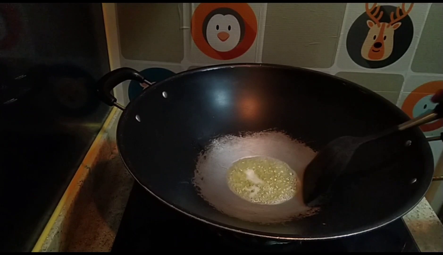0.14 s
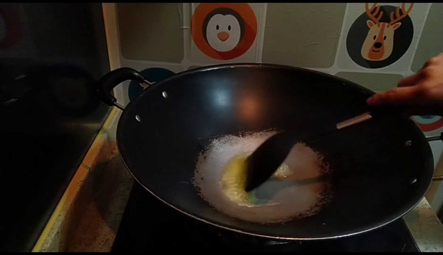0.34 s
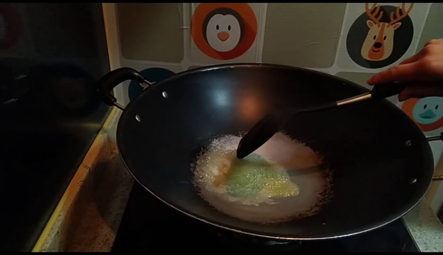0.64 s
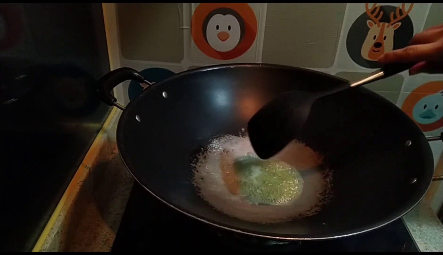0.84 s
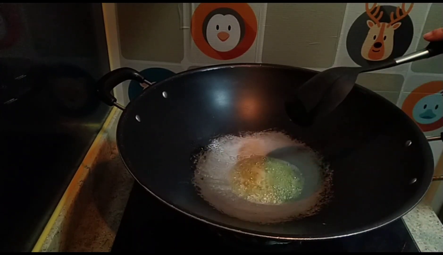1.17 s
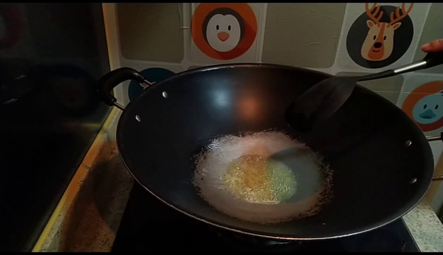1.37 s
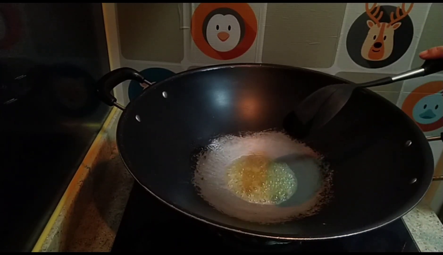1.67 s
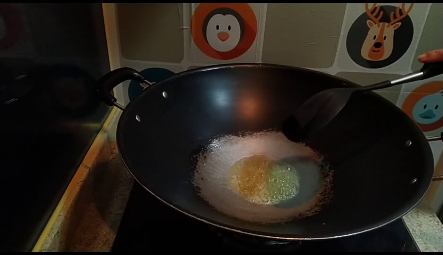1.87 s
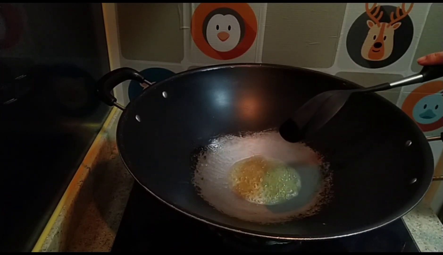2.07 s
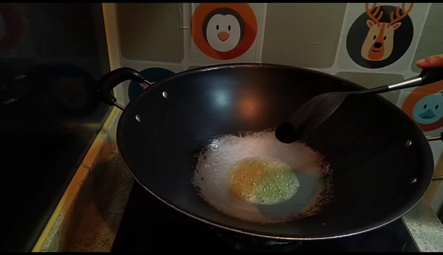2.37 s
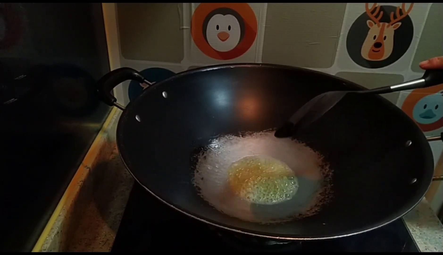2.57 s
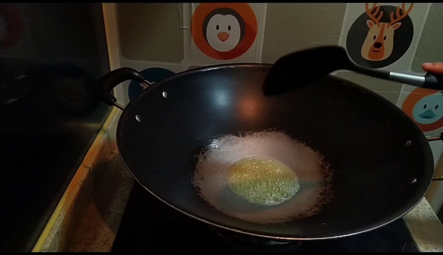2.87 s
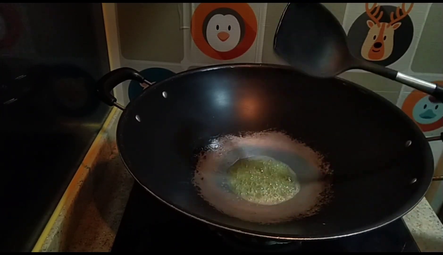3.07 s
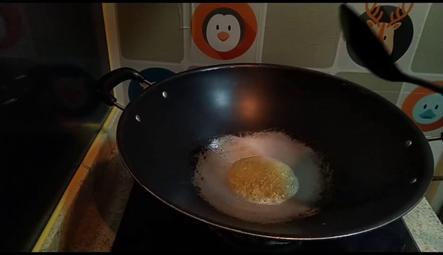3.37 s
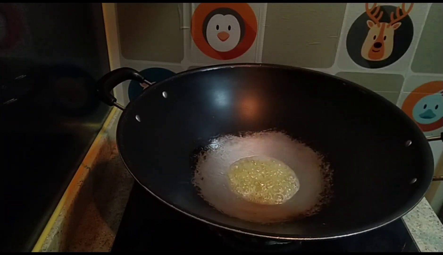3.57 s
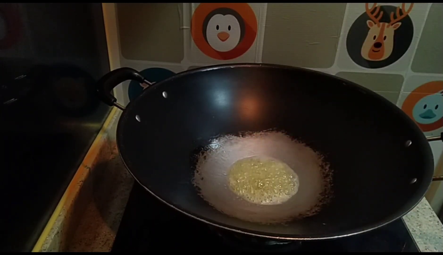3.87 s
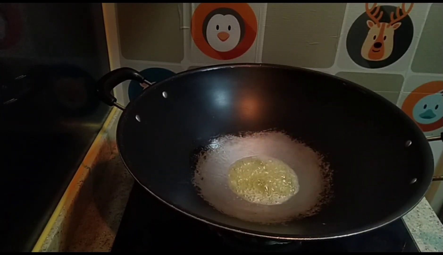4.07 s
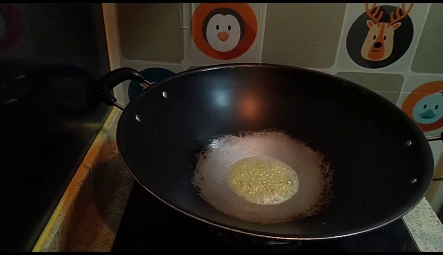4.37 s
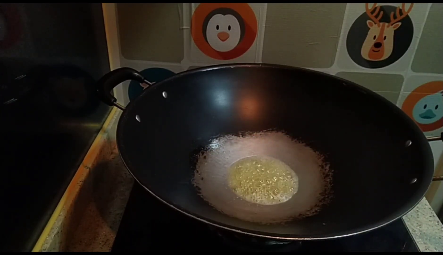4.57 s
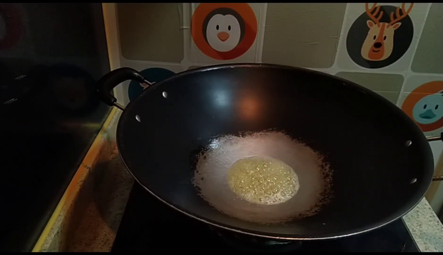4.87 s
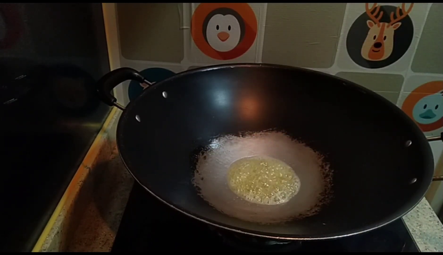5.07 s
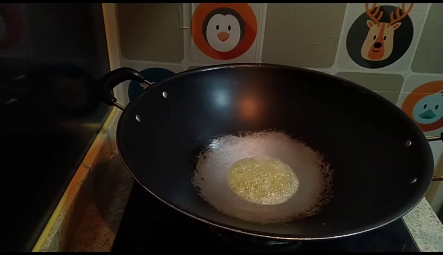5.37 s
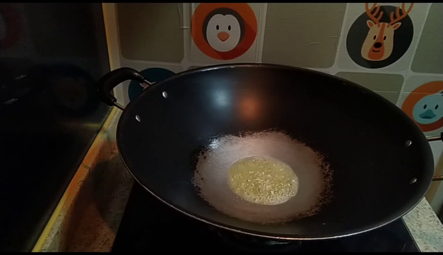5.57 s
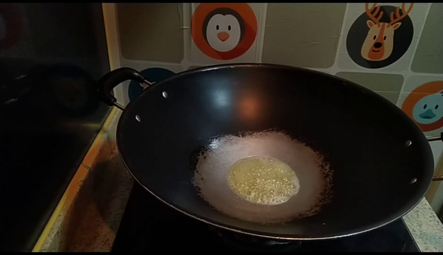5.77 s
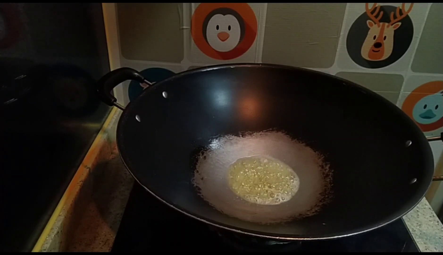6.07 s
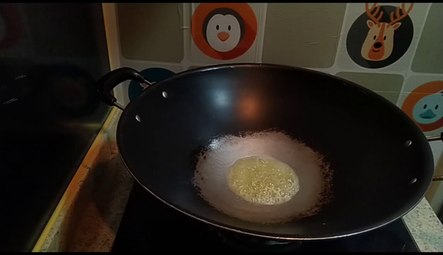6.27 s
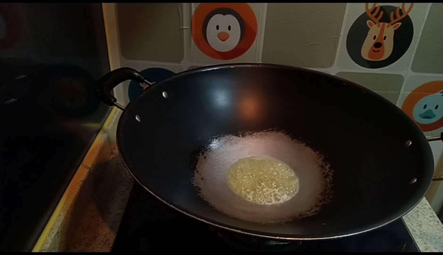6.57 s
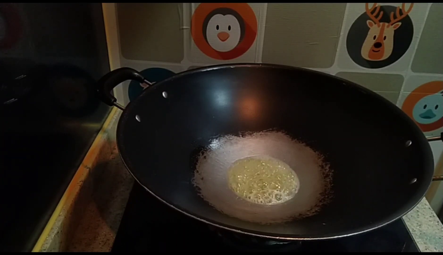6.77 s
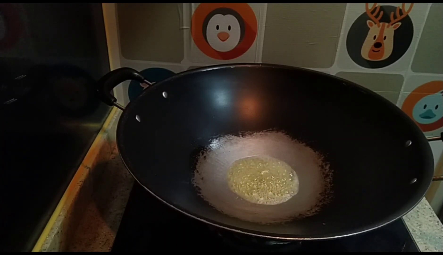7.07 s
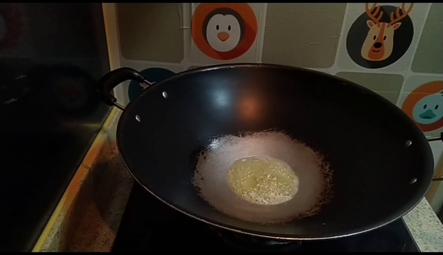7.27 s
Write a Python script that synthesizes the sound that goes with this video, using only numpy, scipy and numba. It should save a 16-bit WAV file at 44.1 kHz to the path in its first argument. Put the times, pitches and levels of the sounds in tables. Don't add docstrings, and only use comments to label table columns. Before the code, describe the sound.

Butter is already frying briskly at 0 s in a thin steel wok, close to a phone: thousands of tiny bursts make a dense, bright crackle with a metallic ring around 2 to 5 kHz. From 0.2 to 0.8 s a spatula spreads the fat, with soft scrapes and dull taps; the pan ring thins and a higher fizz and spray hiss swell, lingering until about 2 s. Sharp pops and fine spits keep coming at uneven gaps, with lower blips near 1.3, 1.9 and 2.4 s. Light taps recur around 1.4, 2.8 and 3.6 to 4 s. By 3.5 s the sizzle is fuller and steady. A hard hollow knock with a quick rebound lands on the counter at 5.7 s. Frying continues, popping, to the end at about 7.4 s. The extractor fan is mostly suppressed, leaving little bass and short muffled flutters.

```python
import sys
import numpy as np
from scipy import signal
from scipy.fft import rfft, irfft, next_fast_len
from scipy.io import wavfile
from scipy.ndimage import uniform_filter1d
from numba import njit

SR = 44100
rng = np.random.default_rng(int(sys.argv[2]) if len(sys.argv) > 2 else 0)


def elevation(decibels):
    levels = np.asarray(decibels, float)
    return 10 ** (levels / 20)


def log_audio(samples):
    frames = np.atleast_2d(samples).T
    limited = np.clip(frames, -1, 1)
    pcm = np.round(limited * 32767).astype(np.int16)
    wavfile.write(sys.argv[1], SR, pcm)


N = 327663

# (frequency [Hz], density [dB per Hz])
HOOD_ROAR = [(15, -52), (25, -26), (43, -35), (108, 2), (198, -13), (306, 1.5), (371, -5), (473, -3.5),
             (525, -2), (593, -6.5), (798, -1), (917, -6.5), (1600, -7.5), (2080, -24), (3520, -120)]
# (frequency [Hz], width [Hz], gain [dB])
DUCT_MODES = [(96.5, 3.6, 9.3), (325, 9.6, 8.5), (528, 9.6, 10.5), (1263, 42, 6.5), (1400, 42, 4.8)]
# (time [s], vigour [dB], spread thin by the spatula [0-1])
FAT_POOL = [(0.0, 2.5, 0.2), (0.05, 1, 0.1), (0.2, 0, 0.6), (0.351, 0.5, 1.22), (.65, -0.5, 1.0),
            (1.05, 1.5, 0.65), (1.3, 1.5, 0.44), (1.7, 0, 0.58), (2.2, 0.0, 0.18), (3.37, 0.0, 0),
            (3.6, 0, .25), (3.9, 0.8, .05), (4.3, 0, 0), (5.1, 0.05, 0.03), (6.1, .5, 0.12),
            (6.64, 0.2, 0.11), (7.43, 0.8, 0.14)]
# (frequency [Hz], level [dB], t60 [s])
WOK_MODES = [(1848, 3, 0.076), (2004, 1, 0.081), (2260, -1, 0.054), (2588, 0.5, 0.12), (2835, -2, 0.12),
             (3156, 3.5, 0.036), (3250, 1, 0.11), (3494, 3, 0.091), (3680, 0.5, 0.093), (3990, -2.5, 0.072),
             (4150, 2, 0.059), (4390, -1.5, 0.039), (4880, -6, 0.027)]
# (frequency [Hz], gain [dB])
BODY_COLOUR = [(900, -15), (1500, -7), (2000, -3), (2600, -6), (3200, -1), (4200, -1), (5000, -3),
               (6500, -9.5), (9000, -69.5)]
# (frequency [Hz], gain [dB])
FIZZ_COLOUR = [(3000, -12), (4500, -6.5), (5200, -1), (7200, 1.5), (7900, -2.5), (8660, -15.5),
               (10300, -30), (12300, -53)]
# (frequency [Hz], gain [dB])
SPRAY_COLOUR = [(5500, -6), (7300, 21), (8200, 16.5), (9000, 8.5), (10300, 3.5), (12300, -4.5), (15000, 3),
                (17000, -30)]
# (time [s], peak [dB], pitch [Hz], suppressor open [s])
LOW_BUBBLES = [(0.003, -35, 2040, 0.03), (0.0348, -32, 1947, .12), (.823, -40, 2040, .025),
               (1.257, -23.5, 2275, 0.11), (1.5304, -40, 1900, .03), (1.7305, -37, 2170, 0.048),
               (1.8632, -25, 2330, .06), (2.145, -27.5, 2167, 0.091), (2.3825, -27.5, 2160, 0.13),
               (2.626, -46, 2100, 0.099), (2.695, -30, 1877, 0.11), (3.163, -37, 2140, 0.12),
               (3.3677, -27, 1993, 0.12), (3.9903, -39, 2030, .16), (4.19, -45, 2200, 0.04),
               (4.31, -41, 1970, .17), (4.5301, -32, 2040, 0.062), (4.69, -46, 2130, 0.06),
               (4.838, -46, 2000, 0.4), (5.23, -42, 2280, .054), (5.306, -44, 2080, 0.18),
               (5.4615, -33, 2060, 0.22), (5.7234, -28.5, 2074, 0.19), (6.203, -36, 2150, .07),
               (6.2936, -38, 2040, 0.11), (6.5256, -30, 1970, 0.12), (6.8299, -31.5, 2135, 0.15),
               (6.9638, -29, 2120, 0.16), (7.183, -30, 2260, 0.098), (7.2709, -25, 2100, 0.12)]
# (time [s], peak [dB], pitch [Hz])
BIG_BUBBLES = [(0.2155, -17.5, 3110), (0.5487, -21, 4430), (0.5935, -16, 4540), (0.878, -18.5, 4230),
               (1.2057, -21, 3160), (1.2438, -15, 3990), (1.696, -16, 7340), (1.7908, -16, 6850),
               (2.0228, -20, 4120), (2.7716, -15, 6020), (3.5084, -17.5, 4150), (3.8656, -19, 3680),
               (3.9055, -19, 3600), (4.1225, -14.5, 4510), (4.162, -19.5, 2700), (4.1939, -15, 4030),
               (4.5521, -19.5, 3450), (4.6284, -16.5, 3205), (4.9806, -20, 4580), (5.214, -17, 4380),
               (5.3657, -21, 3580), (5.8591, -17, 3680), (5.9788, -18, 3370), (6.0756, -19, 3330),
               (6.0995, -20, 3170), (6.135, -18.5, 3280), (6.29, -16, 4550), (6.15, -19, 3420),
               (7.0803, -16, 3860), (7.1642, -14.5, 4160)]
# (time [s], peak [dB])
FAT_SPITS = [(0.0618, -47), (0.2144, -41), (0.2518, -44), (0.3027, -44), (0.5397, -50), (0.7193, -42),
             (0.7377, -52), (0.9497, -46), (1.1388, -41), (1.3423, -48), (1.4077, -43), (1.7355, -48),
             (1.7908, -41), (1.8881, -47), (2.0243, -46), (2.2603, -45), (2.4603, -52), (2.5032, -44),
             (3.1857, -41), (3.3857, -48), (3.691, -54), (4.0432, -53), (4.1205, -56), (4.288, -52),
             (4.7296, -49.5), (4.815, -58), (6.022, -48), (6.4712, -52)]
# (time [s], length [s], lift above shut [dB])
WOK_HUMS = [(.201, 0.14, 27), (0.636, .1, 15), (.93, 0.26, 13), (1.212, 0.13, 18), (1.587, .083, 26),
            (1.76, 0.081, 23), (2.225, 0.045, 26), (2.326, 0.059, 33), (2.776, 0.099, 11),
            (3.603, .096, 18), (5.95, .15, 12)]
# (time [s], length [s], frequency [Hz], lift above shut [dB])
PAN_TAPS = [(0.343, 0.19, 1400, 21.5), (0.348, 0.028, 661, 20), (0.369, 0.032, 528, 38),
            (0.415, 0.041, 325, 23.5), (0.423, 0.027, 528, 19), (0.53, 0.048, 1347, 16),
            (0.642, 0.031, 546, 23.5), (0.647, 0.13, 1430, 24), (0.744, 0.042, 927, 17),
            (0.797, 0.062, 330, 16.5), (1.396, 0.049, 554, 24), (1.412, 0.1, 314.6, 20),
            (2.755, 0.07, 528, 19), (3.287, 0.04, 1267, 14), (3.597, 0.025, 1285, 18),
            (3.669, 0.05, 532, 23), (3.95, 0.014, 1265, 31), (4.028, 0.016, 522, 28),
            (4.062, 0.043, 520, 19), (4.33, 0.048, 1280, 15), (4.8, .04, 1350, 14),
            (4.942, 0.1, 1290, 18.5), (5.283, 0.053, 1270, 12), (5.561, 0.023, 1270, 17.5),
            (5.81, .045, 1236, 11.5), (6.008, 0.032, 531, 26), (6.528, 0.056, 318, 15),
            (6.588, 0.08, 1260, 19.5), (6.664, 0.069, 325, 8), (1.49, 0.057, 454, 11)]
# (time [s], level [dB], delay of the low modes [s], suppressor open [s])
COUNTER_KNOCKS = [
    (5.629, -43, .008, .03),
    (5.723, -31, .008, 0.084),
    (5.738, -34, .004, 0.00075),
]
# (frequency [Hz], level [dB], t60 [s])
COUNTER_MODES = [(444, -10, 0.3), (528, -10.5, 0.13), (950, -10, 0.24), (1085, -1.5, 0.089),
                 (1172, 4.5, 0.22), (1360, -30, 0.24)]
# (low limit [Hz], high limit [Hz], delay [s])
KNOCK_OPENINGS = [
    (910, 1355, 0.00094),
    (405, 570, 0.0043),
]

HOOD_DB = -68
RING_DB, RING_SPREAD_DB = -37, -5.5
FIZZ_DB, FIZZ_SPREAD_DB = -43.5, 3
SPRAY_DB, SPRAY_SPREAD_DB = -77, 17
FILM_LAG_S = 0.54
SMALL_POP_GAP_S, SMALL_POP_DB, SMALL_POP_SPREAD_DB = 0.13, -22.5, 1
CUT_DB = 27.5
EDGE_HZ, TOP_HZ = 2208, 15450
SAG_DB, SAG_TOP_HZ = -9.5, 2540
HUM_HZ = 1851
GLUG_REACH_HZ, GLUG_LIFT_DB, LIFT_PER_DB = 286, 22, 0.6
KNOCK_LIFT_DB = 28.5


def colour(x, table):
    hz, db = np.transpose(table)
    grid = np.maximum(np.arange(2049) * SR / 4096, 1)
    log_gain = np.interp(np.log(grid), np.log(hz), db) * np.log(10) / 20
    cepstrum = irfft(log_gain)
    cepstrum[1:2048] *= 2
    cepstrum[2049:] = 0
    response = irfft(np.exp(rfft(cepstrum)))
    return signal.fftconvolve(x, response)[:N]


def set_rms(x, db):
    return x * elevation(db) / np.sqrt(np.mean(x ** 2))


def ring(x, hz, t60):
    radius = np.exp(-np.log(1000) / (t60 * SR))
    w = 2 * np.pi * hz / SR
    return signal.lfilter([0, np.sin(w)], [1, -2 * radius * np.cos(w), radius ** 2], x + 1e-18)


def walk(rate):
    levels = np.repeat(rng.standard_normal(8 * rate + 2), 4)
    knots = uniform_filter1d(levels, size=4)
    return 1.58 * np.interp(np.arange(N) * 4 * rate / SR, np.arange(len(knots)), knots)


def clicks(per_s, spread_db, bunch_db):
    where = rng.integers(0, N, size=int(per_s * 8))
    size = elevation(spread_db * np.minimum(rng.exponential(size=len(where)), 4.5))
    bunching = walk(10) + walk(40) + walk(120)
    return where, size * elevation(bunch_db * bunching)[where]


def crackle(where, size):
    strength = size * rng.standard_normal(len(where))
    return set_rms(np.bincount(where, strength, minlength=N), 0)


def clicks_at(times, peaks):
    x = np.zeros(N)
    np.add.at(x, (times * SR).astype(int), peaks)
    return x


def smear(x, t60, wet_db):
    keep = elevation(-120 / (t60 * SR))
    energy = signal.lfilter([1 - keep], [1, -keep], x ** 2 + 1e-18)
    return x + elevation(wet_db) * np.sqrt(energy) * rng.standard_normal(N)


def hood():
    size = next_fast_len(N, real=True)
    hz = np.arange(size // 2 + 1) * SR / size
    last_db = HOOD_ROAR[-2][1]
    table = np.array(HOOD_ROAR[:-1] + [(2400, last_db - 6), (5000, last_db - 30)])
    db = np.interp(np.log(hz + 1), np.log(table[:, 0]), table[:, 1])
    for mode_hz, width_hz, gain_db in DUCT_MODES:
        db = db + gain_db / (1 + (2 * (hz - mode_hz) / width_hz) ** 2)
    roar = irfft(rfft(rng.standard_normal(size)) * elevation(db), size)[:N]
    return set_rms(roar, HOOD_DB + 2 + CUT_DB)


@njit
def grains(where, stop, size, step, turn):
    y = np.zeros(stop.max())
    for k in range(len(where)):
        z, p = size[k], step[k]
        for i in range(where[k], stop[k]):
            y[i] += z.imag
            z *= p
            p *= turn[k]
    return y


def bubbles(per_s, low_hz, high_hz, cycles, glide, spread_db, bunch_db):
    where, size = clicks(per_s, spread_db, bunch_db)
    chance = rng.random((2, len(where)))
    hz = low_hz * (high_hz / low_hz) ** chance[0]
    fade = cycles * (0.44 + 1.61 * chance[1]) * SR / hz
    w = 2 * np.pi * hz / SR
    stop = where + (4 * fade).astype(int)
    start = size * np.sqrt(hz / fade) + 0j
    y = grains(where, stop, start, np.exp(1j * w - 1 / fade), np.exp(1j * w * glide / fade))
    return set_rms(np.pad(y, (0, N))[:N], 0)


def ringing_pan(bursts):
    thumps = clicks(600, 3.25, 1.0)
    wall = 0
    for hz, db, t60 in WOK_MODES:
        wall = wall + elevation(db) * set_rms(ring(crackle(*thumps), hz, t60), 0)
    pings = bubbles(1000, 1504, 5524, 8.7, 0.0406, 2.96, 1.0)
    cracks = smear(crackle(*bursts) + 0.5 * crackle(*thumps), 0.057, 4.7)
    body = colour(cracks + elevation(-3.0) * pings, BODY_COLOUR)
    return set_rms(body, -0.57) + set_rms(wall, -3)


def fizz(bursts):
    fine = set_rms(0.69 * crackle(*bursts) + crackle(*clicks(5000, 3.7, 0.42)), 0)
    pings = bubbles(1500, 4195, 9586, 15.6, 0.0434, 2.23, 1.1)
    return set_rms(colour(smear(fine, 0.031, 3.6) + elevation(-1.0) * pings, FIZZ_COLOUR), 0.22)


def spray():
    ticks = 0.8 * crackle(*clicks(200, 3.2, 1.6))
    hiss = 2.3 * rng.standard_normal(N) * elevation(0.86 * walk(9))
    return set_rms(colour(smear(ticks + hiss, 0.031, 0), SPRAY_COLOUR), 10.0)


def frying():
    s, *columns = np.transpose(FAT_POOL)
    vigour_db, spread = (np.interp(np.arange(N) / SR, s, column) for column in columns)
    keep = np.exp(-1 / (FILM_LAG_S * SR))
    film = signal.lfilter([1 - keep], [1, -keep], spread, zi=[keep * spread[0]])[0]
    ring_db = vigour_db + RING_DB + RING_SPREAD_DB * spread
    fizz_db = vigour_db + FIZZ_DB + FIZZ_SPREAD_DB * film
    spray_db = vigour_db + SPRAY_DB + SPRAY_SPREAD_DB * film
    bursts = clicks(3000, 2.6, 0.57)
    out = elevation(ring_db - 0.35) * ringing_pan(bursts)
    out = out + elevation(fizz_db + 0.17) * fizz(bursts)
    return out + elevation(spray_db + 2.8) * spray()


def small_pops():
    slots = np.arange(0, N / SR - SMALL_POP_GAP_S, SMALL_POP_GAP_S)
    when, mode, size = rng.random((len(slots), 3)).T
    hz = np.array(WOK_MODES)[3:12, 0][(9 * mode).astype(int)]
    peak_db = SMALL_POP_DB + SMALL_POP_SPREAD_DB * (2 * size - 1)
    return list(zip(slots + when * SMALL_POP_GAP_S, peak_db, hz))


def pops():
    out, t = np.zeros(N + 2048), np.arange(2048) / SR
    rows = BIG_BUBBLES + [row[:3] for row in LOW_BUBBLES] + small_pops()
    for (s, db, hz), rag in zip(rows, rng.standard_normal((len(rows), 2048))):
        snap = 0.55 * np.sin(2 * np.pi * 1.08 * hz * t) * elevation(-60 * t / 0.012)
        wobble = 0.5 + 0.68 * uniform_filter1d(rag, size=24) * np.sqrt(24)
        tone = 0.75 * wobble * np.sin(2 * np.pi * hz * t) * elevation(-60 * t / 0.081)
        crack = 0.28 * rag * elevation(-60 * t / 0.034)
        i = int((s - 0.0004) * SR)
        out[i:i + 2048] += elevation(db - 5.5) * (snap + tone + crack)
    return colour(out, [(1000, -42), (1800, 5.5), (7500, -11.5), (8700, -13), (12000, -60)])


def spits():
    s, db = np.transpose(FAT_SPITS)
    ticks = clicks_at(s, elevation(db + 12.5))
    return colour(smear(ticks, 0.037, -2.5), [(3000, -12), (7000, 2), (9500, 5.5), (12000, -7), (15000, -3)])


def taps():
    out, t = np.zeros(N + 12000), np.arange(12000) / SR
    for (s, length, hz, lift_db), rag in zip(PAN_TAPS, rng.standard_normal((len(PAN_TAPS), 12000))):
        roughness = 0.79 + 0.67 * uniform_filter1d(rag, size=500) * np.sqrt(500)
        shape = np.minimum(t / 0.0053, 1) * elevation(-14 * (t / length) ** 2)
        db = -42.5 + 3.7 * (hz < 400) + 0.24 * (lift_db - CUT_DB)
        i = int(s * SR)
        out[i:i + len(t)] += elevation(db) * roughness * shape * np.sin(2 * np.pi * hz * t)
    return out[:N]


def knocks():
    s, db, late, _ = np.transpose(COUNTER_KNOCKS)
    out = 0
    for hz, mode_db, t60 in COUNTER_MODES:
        out = out + ring(clicks_at(s + late * (hz < 800), elevation(db + mode_db)), hz, t60)
    return out * (1 + 0.3 * walk(90))


def scene():
    return np.tile(hood() + frying() + pops() + spits() + taps() + knocks(), (2, 1))


def wide_openings():
    rows = []
    for s, db, hz, hold in LOW_BUBBLES:
        lift_db = GLUG_LIFT_DB + LIFT_PER_DB * (db + 30.5)
        rows.append((s - 0.004, hold, hz - GLUG_REACH_HZ, SAG_TOP_HZ, lift_db))
    for s, _, _, hold in COUNTER_KNOCKS:
        if hold > 0:
            for low_hz, high_hz, late in KNOCK_OPENINGS:
                rows.append((s + late, hold, low_hz, high_hz, KNOCK_LIFT_DB))
    return rows


def suppress(x):
    edge_width_hz, flutter, shut_flutter_db, wander_hz = 45, 0.62, 3.0, 40
    opening_hz, open_s, close_s, creep_hz_per_s = 45, 0.0012, 0.037, 900
    hz, s, z = signal.stft(x, SR, nperseg=512, noverlap=384)
    hz = hz[:40, None]
    chance = rng.standard_normal((2, len(hz), len(s)))
    chance = uniform_filter1d(chance, size=10, axis=2) * np.sqrt(10)

    def above(limit_hz):
        return 0.5 + 0.5 * np.tanh((hz - limit_hz) / edge_width_hz + flutter * chance[0])

    def window(start, length, fall):
        return 0.27 * (1 + np.tanh((s - start) / open_s)) * (1 + np.tanh((start + length - s) / fall))

    when, _, spread = np.transpose(FAT_POOL)
    edge = EDGE_HZ + wander_hz * np.interp(s, np.arange(N) / SR, walk(6))
    over_edge = above(edge)
    db = (shut_flutter_db * chance[1] - CUT_DB) * (1 - over_edge)
    sag_db = SAG_DB * np.interp(s, when, spread) ** 2 * (1 + 0.47 * chance[1])
    db = db + sag_db * over_edge * (1 - above(SAG_TOP_HZ))
    hums = [(start, length, HUM_HZ, lift_db) for start, length, lift_db in WOK_HUMS]
    for start, length, centre_hz, lift_db in PAN_TAPS + hums:
        centre = int(centre_hz / hz[1, 0])
        near = slice(max(centre - 3, 0), centre + 5)
        shape = np.exp(-((hz[near] - centre_hz) / opening_hz) ** 2 / 2)
        ragged_db = lift_db * (1 + 0.098 * chance[0, near])
        db[near] += ragged_db * window(start, length, 0.5 * close_s) * shape
    for start, length, low_hz, high_hz, lift_db in wide_openings():
        creep = creep_hz_per_s * np.clip(s - start - length / 2, 0, 1)
        ragged_db = lift_db * window(start, length, close_s) * (1 + 0.14 * chance[1])
        db = db + ragged_db * above(low_hz + creep) * (hz < high_hz)
    z[:len(hz)] *= elevation(np.minimum(db, 0))
    return signal.istft(z, SR, nperseg=512, noverlap=384)[1][:N]


def low_pass(x):
    return signal.sosfilt(signal.butter(12, 16460, fs=SR, output="sos"), x)


def record(dry):
    top_cut = signal.ellip(10, 0.2, 60, TOP_HZ, fs=SR, output="sos")
    heard = signal.sosfilt(top_cut, suppress(dry[0]))
    return low_pass(np.tile(heard, (2, 1)))


dry = scene()
out = record(dry)
log_audio(out)
```